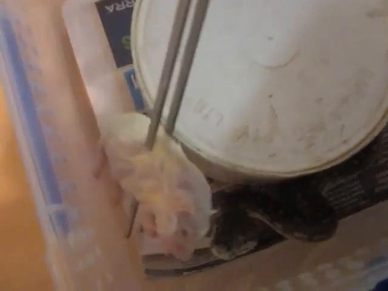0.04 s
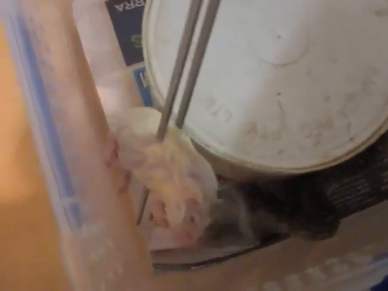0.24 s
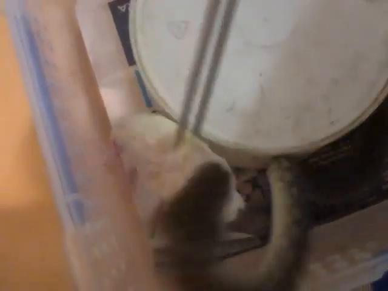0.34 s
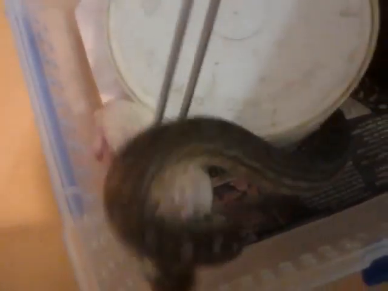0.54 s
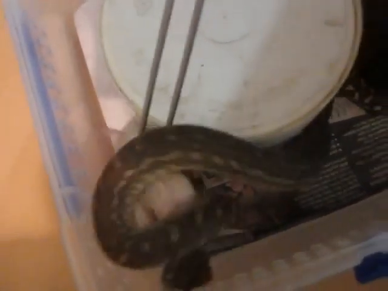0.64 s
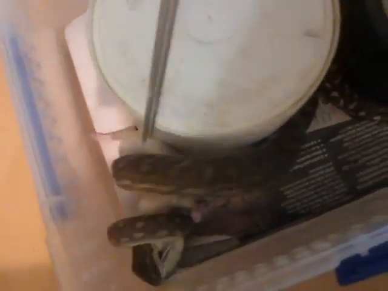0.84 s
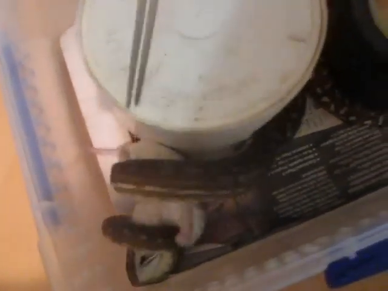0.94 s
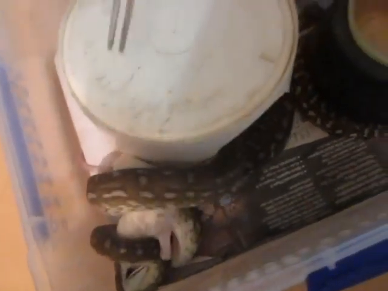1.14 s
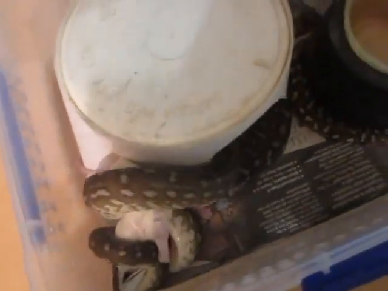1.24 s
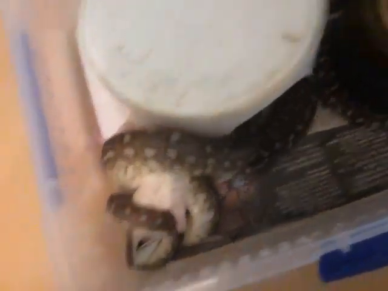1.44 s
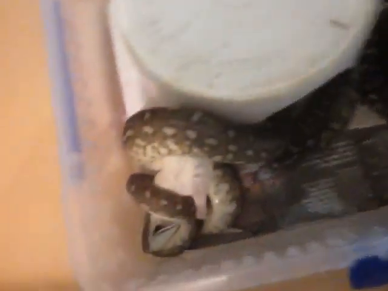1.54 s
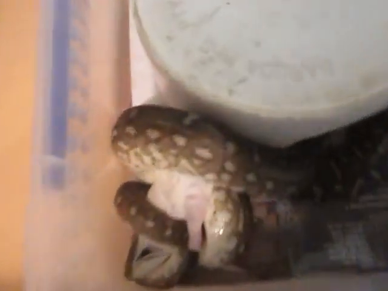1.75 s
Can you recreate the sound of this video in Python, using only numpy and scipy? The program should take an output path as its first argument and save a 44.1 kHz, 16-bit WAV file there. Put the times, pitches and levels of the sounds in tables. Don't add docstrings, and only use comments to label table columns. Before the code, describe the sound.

A snake strikes in a plastic tub over low motor hum and faint hiss. At about 0.25 s come thumps and bright newspaper crackles until 0.32, more rustling knocks at 0.43-0.5, and a hard plastic knock at 0.62. Lighter bumps follow, then steel tongs click and chatter at 0.89. The background dips, then slowly returns, with tiny paper ticks near 1.35-1.5 and 1.62. Dull, grainy sound.

```python
import sys
import numpy as np
from scipy import signal
from scipy.fft import rfft, irfft
from scipy.io import wavfile
from scipy.ndimage import uniform_filter1d

SR = 44100
rng = np.random.default_rng(int(sys.argv[2]) if len(sys.argv) > 2 else 0)


def put_to_file(sound):
    columns = np.atleast_2d(sound).T
    safe = np.clip(columns, -1, 1)
    whole_steps = np.round(safe * 32767)
    wavfile.write(sys.argv[1], SR, whole_steps.astype(np.int16))


def to_linear_factor(level_db):
    exponent = np.asarray(level_db, float) / 20
    return 10 ** exponent


N = 79380


def unit_rms(x):
    return x / np.sqrt(np.mean(x ** 2) + 1e-20)


def add(mix, start_s, sound):
    part = mix[round(start_s * SR):][:len(sound)]
    part += sound[:len(part)]


def coloured(x, spectrum):
    point_hz, point_db = np.transpose(spectrum)
    hz = np.fft.rfftfreq(len(x), 1 / SR)
    db = np.interp(np.log(hz + 1), np.log(point_hz + 1), point_db)
    return irfft(rfft(x) * to_linear_factor(db), len(x))


def resonate(x, hz, width_hz):
    carrier = np.exp(2j * np.pi * hz * np.arange(len(x)) / SR)
    pole = np.exp(-np.pi * width_hz / SR)
    return 2 * (carrier * signal.lfilter([1 - pole], [1, -pole], x / carrier)).real


def ring(modes, hardness_hz, ring_share, weights, rise_s):
    t = np.arange(SR // 5) / SR
    hz, level_db, t60_s = np.transpose(modes)[:, :, None]
    decay = to_linear_factor(level_db - 60 * t / (ring_share * t60_s))
    ratio = hz / hardness_hz
    blow = ratio ** 0.4 / (1 + ratio ** 4)
    size = weights[:, None] * decay * blow
    out = (size * np.sin(2 * np.pi * hz * t)).sum(0) * (1 - np.exp(-t / rise_s))
    return out / abs(out).max()


def strike_spots(blows, modes):
    shape = (len(blows), len(modes))
    return rng.uniform(0.3, 1, shape) * rng.choice([-1, 1], shape)


def waver(hz, width_hz):
    drift = uniform_filter1d(rng.standard_normal(N), 400) * np.sqrt(2 * np.pi * width_hz / SR)
    phase = 2 * np.pi * (hz * np.arange(N) / SR + rng.random())
    return np.sqrt(2) * np.sin(phase + np.cumsum(drift))


# hz, rms_db, width_hz
MOTOR_HUM = [(185.9, -54.5, 1.5), (204.3, -54.5, 1.5), (229.1, -56.5, 1.5), (250.5, -46, .6),
             (273.2, -46.5, .6), (409.4, -56, 2.5), (477.7, -59, 2.5), (736, -57.5, 12), (3124, -57, 30)]
# hz, rms_db
CAMERA_WHINE = [(4140, -63), (5706, -59)]


def tones():
    hum = sum(to_linear_factor(rms_db) * waver(hz, width_hz) for hz, rms_db, width_hz in MOTOR_HUM)
    whine = sum(to_linear_factor(rms_db) * waver(hz, 1) for hz, rms_db in CAMERA_WHINE)
    return hum + whine


# hz, density_db_per_hz
ROOM_SPECTRUM = [(20, -29.5), (40, -19), (120, -13.5), (250, -7), (380, -16), (731, -15.5), (2350, -23.5),
                 (6500, -33)]


def room_air():
    level_db, patch_db = -41, 1.5
    noise = coloured(rng.standard_normal(N), ROOM_SPECTRUM)
    _, _, cells = signal.stft(noise, SR, nperseg=1024)
    patches = uniform_filter1d(rng.standard_normal(cells.shape), 8, 0)
    patches = unit_rms(uniform_filter1d(patches, 6, 1))
    _, air = signal.istft(cells * to_linear_factor(patch_db * patches), SR, nperseg=1024)
    return to_linear_factor(level_db) * unit_rms(air[:N])


def hiss_hump():
    level_db, centre_hz, width_hz = -54.5, 3600, 2500
    return to_linear_factor(level_db) * unit_rms(resonate(rng.standard_normal(N), centre_hz, width_hz))


# time_s, gain_db
CAMERA_GAIN = [(0, -1.5), (.26, -2.5), (.33, -1.5), (0.561, -2), (0.648, -5.5), (0.878, -8.5), (0.908, -12),
               (1.0, -12), (1.148, -12), (1.3, -8), (1.5, -4), (1.65, -3), (1.8, -2.5)]


def room():
    gain_db = np.interp(np.arange(N) / SR, *np.transpose(CAMERA_GAIN))
    return to_linear_factor(gain_db) * (tones() + room_air() + hiss_hump())


# start_s, level_db
TONG_SLIPS = [
    (.8849, -21),
    (.8859, -11),
    (.888, -18),
    (.8891, -15),
    (.8902, -16),
    (.8922, -23),
    (.8955, -29),
]
# hz, level_db, t60_s
TONG_MODES = [(600, -6, 0.025), (920, -8.5, 0.024), (1520, 1, 0.013), (1960, -6, .012),
              (2560, -7.5, 0.0078), (3280, 2, 0.013), (3716, 1.5, .011), (4390, -4, .01),
              (5200, -12, 0.0084), (5950, -3.5, .014)]


def tongs():
    out = np.zeros(N)
    for (start_s, level_db), spot in zip(TONG_SLIPS, strike_spots(TONG_SLIPS, TONG_MODES)):
        add(out, start_s, to_linear_factor(level_db) * ring(TONG_MODES, 12000, 0.7, spot, rise_s=0.00011))
    return out


# start_s, level_db, pitch_hz, t60_s
CREASES = [(0.2588, -24, 4300, .004), (.2972, -15, 2900, 0.016), (.2748, -20, 2600, .006),
           (.2845, -21, 2900, .01), (.291, -23, 3300, .006), (.303, -27, 2700, .006),
           (.3048, -19, 1900, .006), (.3074, -15, 2800, .006), (.3146, -18, 3000, .006),
           (.4465, -24, 2800, .01), (.4915, -32, 3700, .008), (0.4508, -14, 4000, .005),
           (.4509, -22, 5600, .005), (0.5912, -36, 3500, .008), (.8792, -26, 3310, .007),
           (0.8792, -28, 5540, .007), (1.349, -34, 5300, .006), (1.433, -35, 5400, .008),
           (1.478, -34, 5500, .008), (1.502, -34, 5700, .008), (1.6215, -28, 6000, .004),
           (1.6218, -31, 1700, .005), (1.6245, -33, 5600, .006), (1.629, -36, 5200, .006)]


def snaps():
    out = np.zeros(N)
    signs = np.array([1, -1, 1])
    for start_s, level_db, pitch_hz, t60_s in CREASES:
        modes = [(0.7 * pitch_hz, -3, t60_s), (pitch_hz, 0, t60_s), (1.3 * pitch_hz, -3, t60_s)]
        add(out, start_s, to_linear_factor(level_db) * ring(modes, 9000, 0.76, signs, rise_s=0.0001))
    return out


# start_s, length_s, level_db, peak_place_0_to_1, sheet_ring_db
STROKES = [(.245, .02, -40, .6, -6), (0.258, .038, -25.5, 0.6, -4), (.286, 0.035, -22.5, 0.35, 1),
           (0.332, 0.051, -38.5, 0.3, -2.5), (0.381, 0.053, -38.5, 0.5, -9), (0.422, 0.055, -31, .45, -2.5),
           (0.463, 0.055, -40.5, 0.5, -7), (0.585, 0.05, -35, 0.4, -9), (0.6259, 0.013, -31.5, 0.1, -9.5),
           (0.691, 0.026, -44.5, 0.4, -2), (0.778, 0.0487, -38.5, 0.8, -9), (0.815, 0.036, -40, 0.2, -6.5),
           (0.824, 0.06, -40.5, 0.6, -4.5), (.712, .07, -48, .4, -6), (.886, 0.018, -40, 0, -5.5)]
# hz, density_db_per_hz
PAPER_SPECTRUM = [(180, -39.5), (300, -23), (661, -9.5), (768, -8.5), (1780, -7), (2230, -9.5),
                  (2830, -10.5), (6000, -15), (7800, -50), (13200, -120)]


def sheet_mode(slips, hz):
    width_hz = 800
    return unit_rms(resonate(resonate(slips, hz, width_hz), hz, 2 * width_hz))


def scrapes():
    slips_per_s, spread_db = 9000, 2.1
    sizes = to_linear_factor(spread_db * np.minimum(rng.exponential(1, N), 4))
    slips = sizes * rng.choice([-1, 1], N) * (rng.random(N) < slips_per_s / SR)
    rasp = unit_rms(coloured(slips, PAPER_SPECTRUM))
    sheet = sheet_mode(slips, 2850) + to_linear_factor(-9.5) * sheet_mode(slips, 4057)
    out = np.zeros(N)
    for start_s, length_s, level_db, peak_place, sheet_ring_db in STROKES:
        first, count = round(start_s * SR), round(length_s * SR)
        at = slice(first, first + count)
        peak = np.clip(peak_place, 0.05, 0.95)
        rise_fall = np.interp(np.linspace(0, 1, count), [0, peak, 1], [0, 1, 0])
        swell = np.sin(np.pi / 2 * rise_fall) ** 1.2
        out[at] += to_linear_factor(level_db) * swell * unit_rms(rasp[at] + to_linear_factor(sheet_ring_db) * sheet[at])
    return out


# start_s, level_db, pitch_hz, t60_s
KNOCKED_MODES = [(0.27, -35.5, 141.6, 0.11), (0.26, -31, 133, 0.18), (.3, -33.5, 96, 0.072),
                 (.435, -35.5, 130, 0.075), (.47, -40, 99, 0.13), (.556, -29, 137, 0.091),
                 (.574, -29.5, 240, .07), (.59, -32, 102, 0.083), (.622, -28, 150, .06),
                 (.6248, -11, 425, 0.014), (.6266, -15, 800, .02), (.6271, -12, 1250, 0.011),
                 (.6248, -15, 1550, 0.008), (.628, -27, 1980, .015), (.6275, -25, 2900, .01),
                 (.5545, -27, 980, .015), (.5572, -25, 400, .022), (.5632, -25, 240, .04),
                 (.579, -29, 340, .04), (0.57, -38.5, 140, 0.089), (.772, -40, 140, 0.085),
                 (.83, -38.5, 102, .2), (.2675, -21.5, 915, .06), (.2645, -24, 2750, 0.018),
                 (.303, -24, 1540, 0.02), (.283, -27.5, 4700, 0.012), (0.31, -33, 3200, .06),
                 (.44, -29, 2950, 0.03), (.443, -30, 2100, .015), (.4765, -31, 850, 0.018),
                 (.771, -31, 420, 0.037), (.5615, -24, 1600, .009), (.5635, -27, 1150, .012),
                 (.2645, -28, 280, .02), (.2695, -25, 620, .035), (.281, -28, 250, .03),
                 (.2955, -19, 2800, .02), (.309, -25, 1550, .04), (.5885, -37, 2300, .012),
                 (.8865, -31, 580, .015), (.8875, -27, 6000, .015), (.307, -24, 750, .015),
                 (.685, -33, 420, .025), (.704, -38, 2550, .02), (.815, -33, 1850, .02),
                 (1.6217, -30, 3350, .008), (1.6216, -28, 5300, .008)]


def booms():
    out = np.zeros(N)
    for start_s, level_db, pitch_hz, t60_s in KNOCKED_MODES:
        mode = ring([(pitch_hz, 0, t60_s)], pitch_hz, 1, np.ones(1), rise_s=0.8 / pitch_hz)
        add(out, start_s, to_linear_factor(level_db) * mode)
    return out


# start_s, level_db, hardness_hz, ring_share
BODY_BLOWS = [(.2452, -20, 1100, 0.39), (0.2495, -29.5, 463, 0.62), (0.2648, -24, 494, 0.5),
              (.268, -24.5, 1100, .9), (0.281, -31, 600, 1.5), (0.3054, -21, 900, 0.6),
              (0.432, -28.5, 600, 0.62), (0.44, -31.5, 496, 2.6), (0.478, -32, 790, 0.91),
              (.493, -35.5, 600, 1.5), (.556, -27, 555, 0.5), (0.5612, -23, 850, 0.6),
              (0.584, -31, 250, 0.8), (0.609, -32.5, 393.5, 0.64), (0.6203, -28, 300, 0.4),
              (0.625, -20, 1714, 0.3), (0.6273, -26, 1100, 0.3), (.636, -30, 700, .6),
              (0.6849, -30.5, 1100, 0.59), (0.697, -35, 600, 0.93), (0.764, -38.5, 923, 0.93),
              (0.771, -31, 1100, .8), (0.8155, -30.5, 1100, 0.45), (0.845, -33, 500, .9),
              (0.859, -40, 244, 0.58), (1.606, -38.5, 887, 0.82), (1.622, -32, 1000, 0.2)]
# hz, level_db, t60_s
TUB_MODES = [(224.5, -5, .07), (308.4, -2, .06), (427.3, 2.5, 0.045), (524, 0, .05), (651, 0, .04),
             (821, 0, .03), (909, -1, 0.036), (1100, -2.5, 0.025), (1306, 8.5, 0.023), (1546, 10, .025),
             (1648, 7, 0.018), (1866, 13, 0.014), (2327, -3, 0.02), (2800, -12, 0.0099)]


def thumps():
    out = np.zeros(N)
    shape = (len(BODY_BLOWS), len(TUB_MODES))
    spots = rng.uniform(0.28, 1, shape) * rng.choice([-1, 1], shape)
    for (start_s, level_db, hardness_hz, ring_share), spot in zip(BODY_BLOWS, spots):
        sound = ring(TUB_MODES, hardness_hz, ring_share, spot, rise_s=0.00054)
        add(out, start_s, to_linear_factor(level_db) * sound)
    return out


def scene():
    return (room() + tongs() + snaps() + scrapes() + booms() + thumps())[None]


def top_cut(x):
    return signal.sosfilt(signal.butter(12, 7670, fs=SR, output="sos"), x)


def record(dry):
    up, down = 147, 40
    filter_rate_hz = SR * down
    limit, step, offset = 0.9, 1 / 128, -0.0011
    overloaded = limit * np.tanh(dry / limit)
    input_filter = signal.firwin(6001, 6150, fs=filter_rate_hz)
    slow = signal.resample_poly(overloaded, down, up, axis=1, window=input_filter)
    stepped = step * np.floor((slow + offset) / step)
    edge_filter = signal.firwin(2353, 6258, window=("kaiser", 6.05), fs=filter_rate_hz)
    mix = signal.resample_poly(stepped, up, down, axis=1, window=edge_filter)[:, :N]
    return top_cut(mix)


dry = scene()
out = record(dry)
put_to_file(out)
```